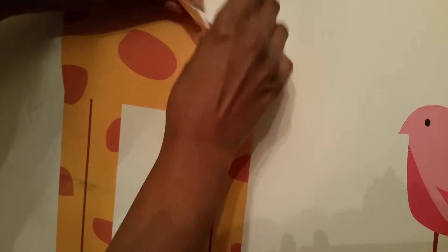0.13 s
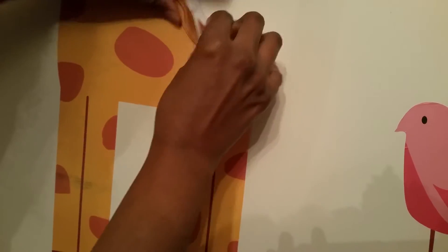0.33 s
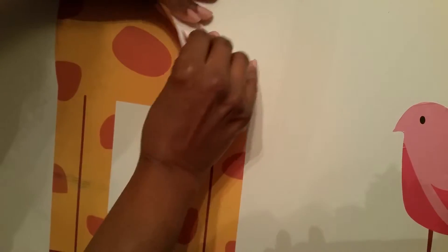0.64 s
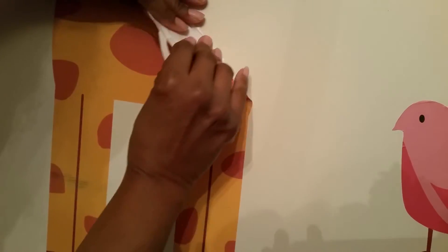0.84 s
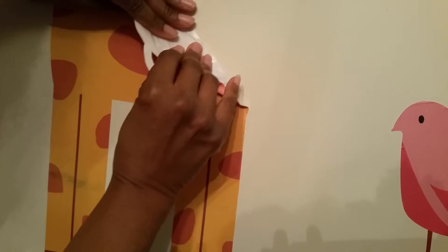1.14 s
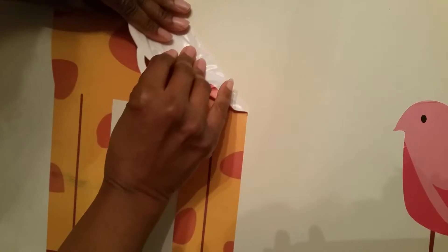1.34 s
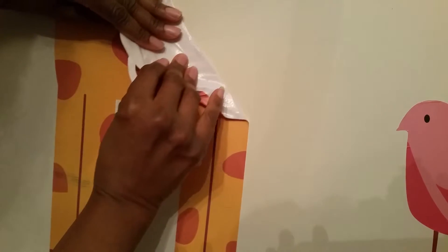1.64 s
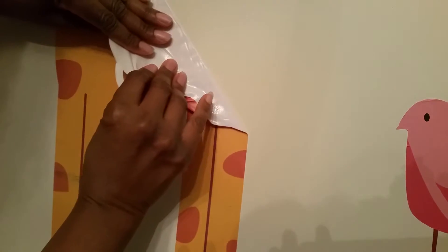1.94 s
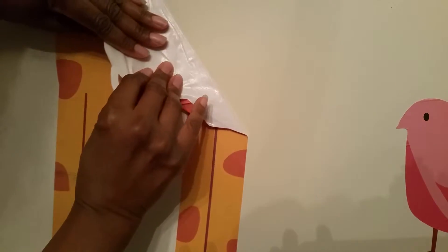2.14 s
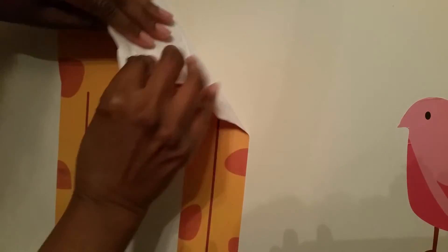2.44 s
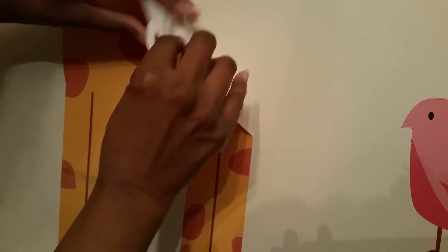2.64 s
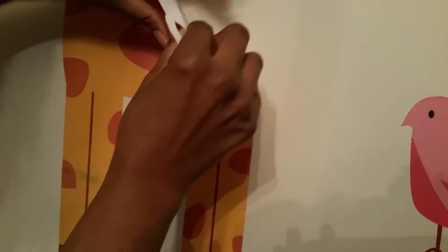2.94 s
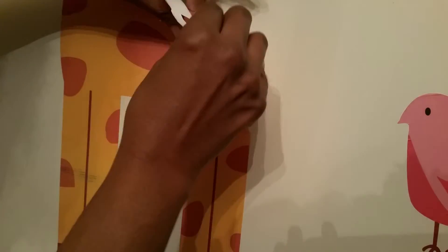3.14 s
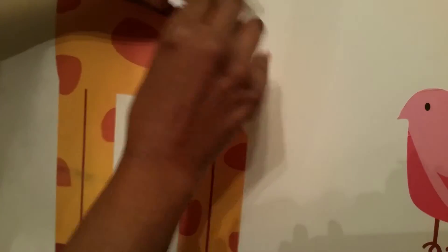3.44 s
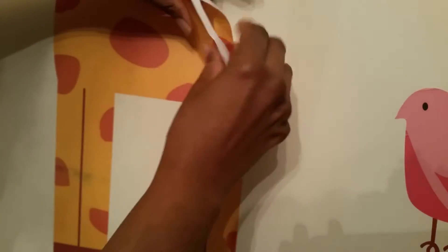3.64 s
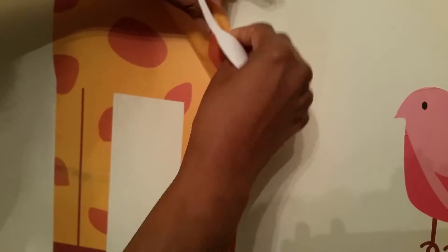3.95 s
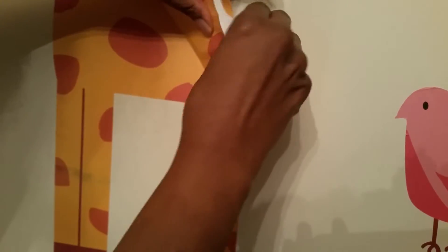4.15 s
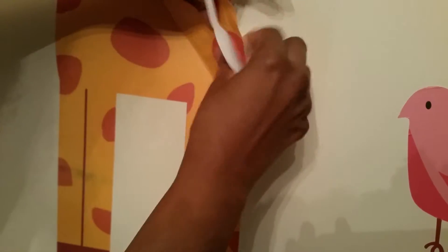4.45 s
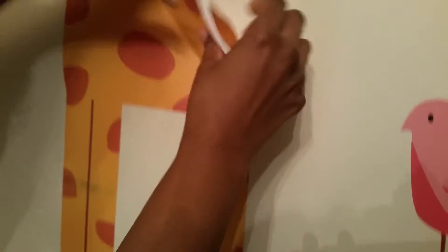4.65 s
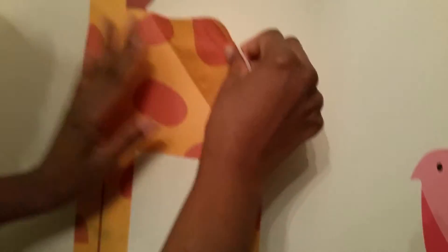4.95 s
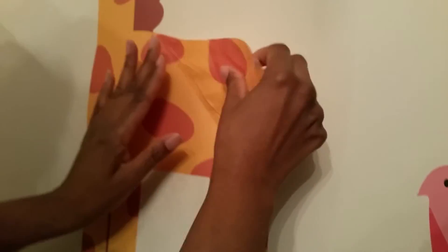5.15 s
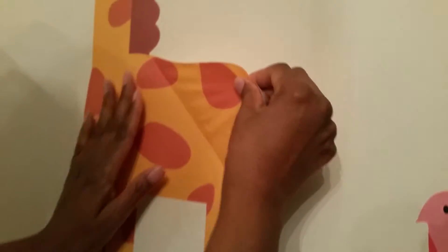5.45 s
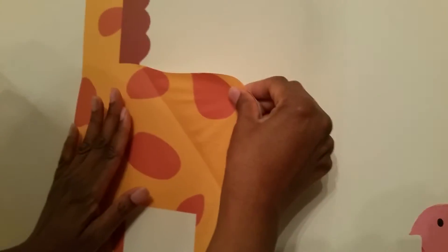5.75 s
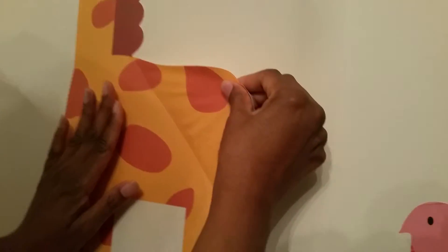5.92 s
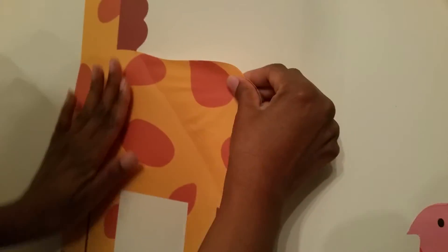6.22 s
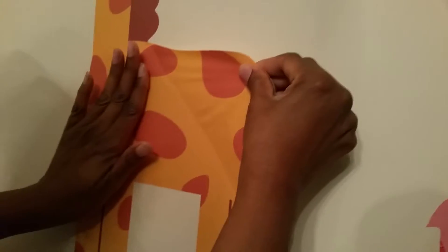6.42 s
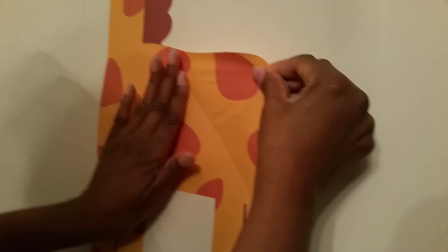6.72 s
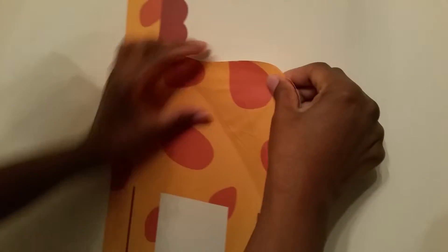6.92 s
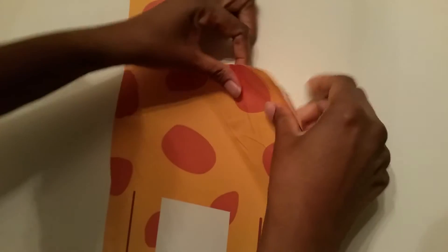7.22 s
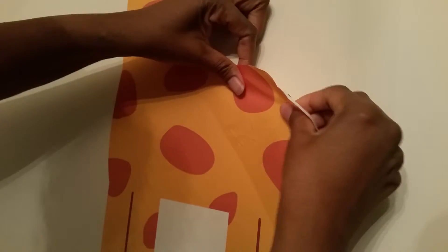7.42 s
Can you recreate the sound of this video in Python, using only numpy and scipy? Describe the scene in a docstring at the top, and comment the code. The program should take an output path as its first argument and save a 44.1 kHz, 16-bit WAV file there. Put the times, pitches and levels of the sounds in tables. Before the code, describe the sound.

Hands work an adhesive fabric sheet on an indoor wall. Quick rustles and small snaps open, then a faint lull leads to bright sharp cracks of glue. More uneven peeling follows, a loud double snap around four seconds, then quieter handling, soft palm swishes and final ticks. Close hand-held stereo microphone, small room with short reverberation, low rumble and faint hum, occasional dull bumps.

```python
"""Fabric rustles and glue snaps over a low drone and room rumble: hands peel a sticky sheet off a wall and smooth
it down again, close to a hand-held phone in a small room. Snaps and rustle are shaped noise bursts and clicks,
gliding palms are swelling hiss, ticks are short rings, and knocks on the phone are pushes sinking in pitch.
Sheet sounds stir the room and reach two unlike microphones; drone, hum and groan are wavering sines."""
import sys
import numpy as np
from scipy import signal
from scipy.io import wavfile
from scipy.ndimage import uniform_filter1d

SR = 44100
rng = np.random.default_rng(int(sys.argv[2]) if len(sys.argv) > 2 else 0)


def unload_audio(sound):
    """Save the sound as a 16-bit wav file, at the path given as the first command line argument."""
    columns = np.transpose(np.atleast_2d(sound))
    # keep every value between -1 and 1, then stretch to whole-number steps
    steps = np.round(np.clip(columns, -1, 1) * 32767)
    wavfile.write(sys.argv[1], SR, steps.astype(np.int16))


def field_ratio(decibels):
    """Amplitude ratio for a level in dB (20 dB per decade); scalars and array-likes work."""
    return 10 ** (np.asarray(decibels, dtype=float) / 20)


N = 334278  # length [samples]
HZ = np.fft.rfftfreq(1024, 1 / SR)  # frequency grid of the colouring filters


def evened(x):
    """Scales to rms 1."""
    return x / np.sqrt(np.mean(x ** 2) + 1e-20)


def read(points, hz):
    """Reads a spectrum table on a log frequency axis."""
    f, value = np.transpose(points)
    return np.interp(np.log(hz + 1), np.log(f + 1), value)


def add(mix, s, sound):
    """Mixes a sound in at time s, cutting it at the end of the mix."""
    part = mix[..., round(s * SR):][..., :sound.shape[-1]]
    part += sound[..., :part.shape[-1]]


def coloured(x, gain):
    """Causal minimum-phase filter with the gains given on the HZ grid."""
    log_gain = np.log(np.maximum(gain, 1e-5))
    circle = np.r_[log_gain, log_gain[-2:0:-1]]
    taps = np.fft.ifft(np.exp(np.conj(signal.hilbert(circle)))).real
    return signal.oaconvolve(x, taps[:len(gain)])[:len(x)]


def sounded(channels, shape):
    """Sends every channel through one spectrum table."""
    return np.array([coloured(c, field_ratio(read(shape, HZ))) for c in channels])


def wander(rate_hz):
    """Slow chance: random points of rms 1, rate_hz of them a second, joined by straight lines."""
    t = np.arange(N) / SR
    knots = rng.standard_normal(int(N / SR * rate_hz) + 3)
    return np.interp(t * rate_hz, np.arange(len(knots)), knots)


PATCH_DB = 2.5  # rms depth of the patches


def patchy(x):
    """Folds of the sheet colour it in random patches, some hundred Hz wide and a few tens of ms long."""
    z = signal.stft(x, nperseg=512)[2]
    patches = rng.standard_normal(z.shape[1:])
    patches = uniform_filter1d(patches, size=4, axis=0)
    patches = evened(uniform_filter1d(patches, size=8, axis=1))
    return signal.istft(z * field_ratio(PATCH_DB * patches), nperseg=512)[1][:, :N]


# Spectrum of the background, scaled as a whole afterwards: (frequency [Hz], relative density [dB per Hz])
FLOOR_SPECTRUM = [(12, -41), (20, -2), (43, -0.5), (117, 6), (289, -7.5), (361, -7), (560, -17),
                  (888, -18.5), (1430, -21.5), (1840, -25.5), (6000, -37.5), (7950, -38), (15200, -34),
                  (16500, -54)]
# Likeness of the two channels of the background: (frequency [Hz], correlation [0-1])
FLOOR_LIKENESS = [(60, 0.97), (240, 0.9), (950, 0.0143), (3770, 0.73), (15000, 0.092)]
FLOOR_DB = -55.5  # rms


def floor():
    """Room rumble, alike in both microphones, and their own hiss: noise built from random spectra."""
    frames, hz = N // 512 + 5, np.fft.rfftfreq(2048, 1 / SR)
    a, b, c, d = rng.standard_normal((frames, 1025, 4)).T
    same = np.clip(read(FLOOR_LIKENESS, hz), -1, 1)[:, None]
    left = a + 1j * b
    right = same * left + np.sqrt(1 - same ** 2) * (c + 1j * d)
    z = np.array([left, right]) * field_ratio(read(FLOOR_SPECTRUM, hz))[:, None]
    noise = signal.istft(z, nperseg=2048, noverlap=1536)[1][:, :N]
    return field_ratio(FLOOR_DB) * evened(noise)


# Course of the drone, silent after the last point: (time [s], frequency [Hz], rms level [dB])
DRONE_COURSE = [(0.0, 97.9, -50), (1.68, 102.5, -61.5), (2.061, 84.2, -56.5), (4.001, 87.14, -59.5)]
# One brief low tone: (start [s], end [s], frequency [Hz], rms level [dB])
GROAN_TONE = (4.52, 4.74, 362, -59)
HUM_HZ, HUM_DB = 119.1, -62  # level is rms
WAVER_DB, WAVER_PER_S = 3, 24  # scale and rate of the level's random wavering


def tones():
    """A drone that drifts in pitch, the mains hum and one brief groan: sines wavering in level and pitch."""
    t = np.arange(N) / SR
    s, hz, db = np.transpose(DRONE_COURSE)
    waver_db = [WAVER_DB * np.clip(wander(WAVER_PER_S), -2, 2) for _ in range(3)]
    drone_turns = np.cumsum(np.interp(t, s, hz) + 5.44 * wander(14)) / SR
    drone_level = field_ratio(np.interp(t, s, db, right=-99) + waver_db[0])
    drone = drone_level * np.sin(2 * np.pi * drone_turns)
    hum_turns = np.cumsum(HUM_HZ + 2.34 * wander(11)) / SR
    hum = field_ratio(HUM_DB + waver_db[1]) * np.sin(2 * np.pi * hum_turns)
    start, end, groan_hz, groan_db = GROAN_TONE
    gate = uniform_filter1d(1. * (t > start) * (t < end), 900)
    groan_turns = np.cumsum(groan_hz + 4.9 * wander(25)) / SR
    groan = gate * field_ratio(groan_db + 2 * waver_db[2]) * np.sin(2 * np.pi * groan_turns)
    return np.sqrt(2) * (drone + hum + groan)  # sqrt(2) makes the levels rms


# Decay of the room: (frequency [Hz], time to fall 60 dB [s])
ROOM_DECAY = [(250, 0.33), (1000, 0.32), (4000, 0.29), (12000, 0.19)]
ROOM_DB = -11  # level of the tails


def room(x):
    """Four sparse tails, fed in quick turns so that echoes stay smooth and unalike; each band dies at its own speed."""
    taps = np.zeros((4, 2, SR // 2))
    # one echo of random sign in every ten samples
    at = np.arange(120, SR // 2 - 20, 10) + rng.integers(0, 10, (4, 2, (SR // 2 - 131) // 10))
    np.put_along_axis(taps, at, rng.choice([-1., 1.], at.shape), 2)
    hz, t, z = signal.stft(taps, SR, nperseg=256)
    decay = field_ratio(-60 * t / read(ROOM_DECAY, hz)[:, None])
    tails = signal.istft(z * decay, SR, nperseg=256)[1]
    tails = tails / np.linalg.norm(tails[0, 0])
    turn = 2 * np.pi * np.arange(N) / SR * np.array([[83], [227]])  # Hz
    fed = x.mean(0) * np.r_[np.cos(turn), np.sin(turn)] / np.sqrt(2)
    return field_ratio(ROOM_DB) * signal.oaconvolve(fed[:, None], tails, axes=2).sum(0)[:, :N]


# Palms gliding flat over the fabric:
# (start [s], end [s], level [dB], brightness [dB per octave], share spent pressing in [0-1])
PALM_GLIDES = [(6.11, 6.299, -52, -0.5, 0.25), (6.271, 6.473, -66, 2, 0.36),
               (6.549, 6.878, -50.5, 0.6, 0.63)]
# Spectrum of skin on the weave, before brightness tilts it: (frequency [Hz], relative density [dB per Hz])
SKIN_SPECTRUM = [(500, -8), (1100, -6.5), (2400, -3.5), (4000, -2), (6200, -7.5), (8200, -14.5),
                 (11000, -20), (15500, -28)]
LIFT_SHARE = 0.28  # part of a glide spent lifting off


def glides():
    """Fine, even hiss of skin on the weave: dull while the palm presses in, brightest at full pressure."""
    out = np.zeros((2, N))
    for start, end, db, tilt_db, press_share in PALM_GLIDES:
        shape = [(hz, level + tilt_db * np.log2(hz / 3000)) for hz, level in SKIN_SPECTRUM]
        u = np.linspace(0, 1, round((end - start) * SR))
        ramps = np.minimum(u / press_share, (1 - u) / LIFT_SHARE)
        swell = np.sin(np.pi / 2 * np.clip(ramps, 0, 1))
        hiss = evened(sounded(rng.standard_normal((2, len(u))), shape))
        dull = uniform_filter1d(uniform_filter1d(hiss, size=9), size=9)
        add(out, start, field_ratio(db) * swell * (dull + swell ** 2 * (hiss - dull)))
    return out


SWELL_SHARE = 0.66  # part of a stroke spent swelling and fading


def stroke(start, end):
    """Power of a stroke: swells, holds, fades."""
    return signal.windows.tukey(round((end - start) * SR), SWELL_SHARE) ** 2


FLAP_PER_BRIGHT = 1.05  # dB that flap and wall lose for each dB of brightness
WEAVE_OVER_DB, WALL_OVER_DB = 1.5, 0.5  # how far weave and wall stand over the level


def layered(db, bright_db):
    """Power of weave, crackle, flap and wall: brightness lifts the crackle and lowers flap and wall."""
    loss_db = FLAP_PER_BRIGHT * bright_db
    over_db = np.array([[WEAVE_OVER_DB], [bright_db], [-loss_db], [WALL_OVER_DB - loss_db]])
    return field_ratio(db + over_db) ** 2


# Spectra of the sheet's weave, its crackle, its flapping and the wall behind it, shared with the snaps:
# each (frequency [Hz], relative density [dB per Hz])
WEAVE_SPECTRUM = [(700, -35), (1500, -0.5), (2500, 2), (3400, -0.5), (6000, -36)]
CRACKLE_SPECTRUM = [(2000, -49.5), (3300, 1), (4300, 2), (6000, -3.5), (7000, -3), (8200, -3),
                    (11000, -6.5), (15500, -21)]
FLAP_SPECTRUM = [(200, -28), (500, -3), (1000, 7.5), (1500, 4), (2500, -8.5), (5000, -79)]
WALL_SPECTRUM = [(60, -43.5), (150, 4.5), (300, -1), (450, -6), (900, -20), (2500, -100.5)]
# Rubbing gathers the crackle in a narrower band: (frequency [Hz], added gain [dB])
RUBBED_GAIN = [(4200, 2), (6000, 4), (8500, -3.5), (15000, 0)]
# Strokes of the hands over the sheet: (start [s], end [s], level [dB], brightness [dB])
HAND_STROKES = [(0, 0.075, -56, 1.5), (0.197, 0.302, -53, -5.5), (0.319, 0.394, -50.5, -4.5),
                (0.422, 0.63, -59.5, -1), (0.599, 0.69, -48.5, -1.5), (0.6, 1.14, -68.5, 5),
                (0.914, 1.695, -62, 1.5), (1.387, 2.028, -57, 2), (1.88, 2.41, -86, 19.5),
                (2.429, 2.463, -64, 7), (2.438, 2.657, -64.5, -2), (2.592, 2.913, -59.5, -0.5),
                (2.832, 2.871, -41.5, 4), (2.871, 2.964, -49, 2.5), (3.283, 3.47, -70.5, 5.5),
                (3.526, 3.63, -62.5, 1), (3.812, 4.04, -64, 0), (4.09, 4.25, -55.5, 2),
                (4.167, 4.323, -78, 18), (4.383, 4.468, -64.5, 1), (4.47, 4.797, -67, -1.5),
                (4.77, 4.96, -65.5, 2), (5.176, 5.303, -68, 1), (5.341, 5.392, -57, 0.5),
                (5.366, 5.678, -66.5, -2.5), (5.78, 6.04, -74, 6), (6.88, 6.975, -65, 0),
                (7.004, 7.235, -58.5, 1), (7.164, 7.186, -48.5, 0.5), (7.2, 7.395, -68, 2),
                (7.34, 7.47, -68.5, -3)]
# A hand leaning into the wall rumbles in it: (start [s], end [s], level [dB])
WALL_LEANS = [(0.128, 0.208, -46.5), (2.78, 2.85, -50), (3.562, 3.636, -45), (4.487, 4.762, -50.5),
              (5.177, 5.3, -62), (7.05, 7.26, -51.5)]
IDLE_DB, IDLE_BRIGHT_DB = -77.5, 2  # the held sheet is never quite still


def rustle():
    """Dense tiny clicks of uneven size, in clumps, spread over the sheet; the wall answers with an even rumble."""
    power = layered(IDLE_DB, IDLE_BRIGHT_DB) * np.ones(N)
    for start, end, db, bright_db in HAND_STROKES:
        add(power, start, layered(db, bright_db) * stroke(start, end))
    for start, end, db in WALL_LEANS:
        add(power[-1], start, field_ratio(db) ** 2 * stroke(start, end))
    clumps_db = 2.04 * wander(90) + 0.36 * wander(30)
    rubbed = [(hz, db + read(RUBBED_GAIN, hz)) for hz, db in CRACKLE_SPECTRUM]
    # spectrum, clicks a second, level of the channels' unlike part relative to their common part
    layers = ((WEAVE_SPECTRUM, 4000, .7), (rubbed, 7000, .7), (FLAP_SPECTRUM, 2000, .5))
    out = 0
    for level, (shape, per_s, spread) in zip(np.sqrt(power), layers):
        size = field_ratio(2.12 * np.minimum(rng.exponential(1, N), 5) + clumps_db)
        size = size * (rng.random(N) < per_s / SR)
        clicks = size * (rng.standard_normal(N) + spread * rng.standard_normal((2, N)))
        out = out + level * evened(sounded(clicks, shape))
    rumble = sounded(rng.standard_normal(N) + 0.2 * rng.standard_normal((2, N)), WALL_SPECTRUM)
    return patchy(out) + np.sqrt(power[-1]) * evened(rumble)


# Knocks on the phone, most near its right microphone:
# (time [s], peak of the push [dB], settled pitch [Hz], click over the push [dB], left over right [dB])
PHONE_BUMPS = [(0.153, -26.5, 180, -38, 2.5), (4.528, -33, 189, -35, 3), (5.198, -49, 207, -32, -32),
               (5.228, -42, 202, -20, 6), (5.469, -43, 167, -15.5, -22.5), (5.731, -37, 382, -10.5, -26.5),
               (6.105, -47.5, 312, -20, -21), (6.45, -67, 166, 7, -21), (6.9367, -41.5, 312, -8.5, -19),
               (6.957, -31, 161, -44, -27.5), (7.059, -40, 189, -28, 1), (7.134, -37.5, 210, -28, 0)]
# a knock starts this many times higher and sinks to its pitch; times in cycles of that pitch
START_TIMES, SINK_CYCLES, RISE_CYCLES, FADE_CYCLES = 4.6, 0.14, 0.13, 0.65
# the click also sweeps down through the phone's shell; level over the click's
ZING_HZ, ZING_SINK_MS, ZING_MS, ZING_DB = 5000, 0.784, 1, 2


def bumps():
    """A push of a cycle or two that sinks in pitch, with a click, carried through the phone's body with no room."""
    out, t = np.zeros((2, N)), np.arange(1800) / SR
    noises = rng.standard_normal((len(PHONE_BUMPS), 1800))
    for (s, db, hz, click_db, pan_db), noise in zip(PHONE_BUMPS, noises):
        u = t * hz
        turns = u + (START_TIMES - 1) * SINK_CYCLES * (1 - np.exp(-u / SINK_CYCLES))
        swell = (1 - np.exp(-(u / RISE_CYCLES) ** 2)) * np.exp(-u / FADE_CYCLES)
        push = -np.sin(2 * np.pi * turns) * swell
        click = 2.8 * field_ratio(click_db) * uniform_filter1d(noise, size=3) * np.exp(-t / 0.0006)
        sweep = ZING_HZ * ZING_SINK_MS / 1000 * (1 - np.exp(-t * 1000 / ZING_SINK_MS))
        life = t * 1000 / ZING_MS
        click += field_ratio(click_db + ZING_DB) * np.sin(2 * np.pi * sweep) * life * np.exp(1 - life ** 2)
        sides = field_ratio(db + np.array([[pan_db / 2], [-pan_db / 2]]))
        add(out, s, sides * (push / abs(push).max() + click))
    return out


# Short high rings: single threads parting, or the bright treble edge of a hard snap:
# (time [s], peak level [dB], pitch [Hz])
SHORT_RINGS = [(1.5875, -14.5, 4700), (1.6987, -11.5, 4570), (1.7947, -12, 6400), (1.8486, -18.5, 5000),
               (1.8683, -12, 4750), (2.8424, -25, 5800), (2.8557, -22, 6300), (2.901, -33, 6100),
               (2.942, -27, 5140), (4.167, -11.5, 10000), (4.1754, -15, 12500), (5.2435, -18.5, 2830),
               (5.3692, -32, 1460), (7.2355, -27, 2460)]
TICK_RISE_CYCLES, TICK_FADE_CYCLES = 1.5, 1.7


def ticks():
    """Each tick is a sine of a few cycles that swells and dies at once."""
    out, t = np.zeros((2, N)), np.arange(800) / SR
    for s, db, hz in SHORT_RINGS:
        u = t * hz
        swell = (1 - np.exp(-u / TICK_RISE_CYCLES)) * np.exp(-u / TICK_FADE_CYCLES)
        ring = np.sin(2 * np.pi * u) * swell
        add(out, s, field_ratio(db) * ring / abs(ring).max())
    return out


# a hard snap is over quickest, weaker ones tear longer: time to fall about 5 dB, and what each dB below hard adds
SHORTEST_MS, HARD_DB, MS_PER_DB = 3.3, -22.5, 0.11
CRACK_DB, FIRST_DB, FIRST_MS = 13, 5.5, 1.17  # the first thread cracks alone, then a brief flurry
RING_HZ, RING_WIDTH_HZ, RING_DB = 4700, 2060, 6  # resonance of the freed patch, before tautness shifts it
SCATTER = 1  # level of each thread's unlike part in the two microphones, relative to its common part


def snap(db, flap_db, crackle_db, semitones, chance):
    """One glue thread cracks and a quick run of others follows; those reach each microphone by other paths."""
    t = np.arange(len(chance)) / SR
    ms = SHORTEST_MS + MS_PER_DB * max(HARD_DB - db - max(crackle_db, flap_db, 0), 0)
    size = field_ratio(6.57 * abs(chance[:, 0]) - 8.0 - 4.97 * t / (ms / 1000))
    size *= field_ratio(FIRST_DB * np.exp(-t * 1000 / FIRST_MS))
    threads = size * (chance[:, 1] + SCATTER * chance[:, 2:].T)
    threads[:, 0] = field_ratio(CRACK_DB)
    alike = threads[[0, 0]]  # the wall sounds the same in both microphones
    taut_hz = HZ / 2 ** (semitones / 12)  # a taut sheet sounds higher
    ring = field_ratio(RING_DB / (1 + (2 * (taut_hz - RING_HZ) / RING_WIDTH_HZ) ** 2))
    # the crackle's own spectrum keeps its range
    layers = ((WEAVE_SPECTRUM, 0, taut_hz, threads), (CRACKLE_SPECTRUM, crackle_db, HZ, threads),
              (FLAP_SPECTRUM, flap_db, taut_hz, threads), (WALL_SPECTRUM, flap_db - 9.5, taut_hz, alike))
    out = 0
    for shape, over_db, seen_hz, source in layers:
        gain = ring * field_ratio(read(shape, seen_hz))
        part = np.array([coloured(c, gain) for c in source])
        out = out + field_ratio(db + over_db) * part / abs(part.mean(0)).max()
    return out


# Glue letting go: (time [s], peak of the weave [dB], flap of the sheet over it [dB], crackle over it [dB],
# shift with the sheet's tautness [semitones])
GLUE_SNAPS = [(0.0412, -31, 0.5, 9.5, -2.2), (0.063, -34.5, 8, 7, -2), (0.142, -28.5, -37, -4.5, 1.5),
              (0.288, -44.5, -4, 6, 1.5), (0.334, -31.5, 4.5, -6, 1.5), (0.4736, -50.5, 3, 13.5, -4),
              (0.4883, -57, -5, 18.5, -1), (0.523, -47.5, 6.5, -22, 1.5), (0.578, -31, -12, -21, 0.5),
              (1.5684, -24.5, -11.5, 6.5, 5), (1.5867, -25.5, -3, 8, -2.5), (1.6988, -27, -17, -0.5, 1),
              (1.7942, -24.5, -13, 10, 4.5), (1.8018, -45, -13, 18, 2), (1.867, -32, -8.5, 20, 0),
              (2.261, -51.5, -4, 5, 6), (2.4897, -31.5, 0.5, -0.5, -1), (2.517, -29.5, 2.5, -1, 6.5),
              (2.5327, -20.5, -3.5, 0.5, 4.5), (2.6805, -55, 13, -20, 3), (2.7634, -49.5, 12, 16.5, 4.5),
              (2.796, -37.5, 3.5, 10.5, 0), (2.837, -30, -7, -3, 5.5), (2.8895, -36, 1.5, 8, 6.5),
              (2.9258, -36.5, 1.5, 7.5, -2.3), (3.121, -51, -16, -0.5, -3), (3.207, -61, 14.5, -14.5, 0),
              (3.2878, -43, 4.5, -14, -2), (3.419, -32.5, -3, -12.5, 0.5), (3.5848, -39, 7.5, 7, -1.5),
              (3.6136, -38, -12, -2, 3), (3.863, -27.5, -5.5, -1, 3), (3.925, -33, -24, 1, 8.5),
              (4.1292, -26.5, -8.5, -4, -5.5), (4.147, -29, 7, -10.5, -1), (4.1665, -18.5, -8.5, 5, 5.5),
              (4.174, -21.5, 0, 9, 1), (4.4041, -45.5, -1, -2, 0), (4.4223, -42.5, 0.5, 2, 0),
              (4.4857, -33.5, -4.5, -10.5, 5), (4.582, -37, -2.5, -5, 0), (4.6226, -34, -2, 3.5, -2),
              (4.8, -51, -13, 3.5, -1.5), (4.8766, -50, 8.5, 2, 7), (5.1679, -35.5, 0, 3, 4),
              (5.2434, -24, -8, -5.5, 3), (5.341, -52, -3, 4, 7), (6.9967, -42.5, -13, -4, 2.5),
              (7.1777, -24.5, -16, -5, -0.2), (7.2352, -23.5, -15.5, -10.5, 3), (7.2992, -52, -14, 2, 1),
              (7.4175, -38.5, -18, -7, -1), (7.4233, -37.5, -12, -7, -2)]


def snaps():
    """Lays out every snap, each with its own random run of threads."""
    out, chance = np.zeros((2, N)), rng.standard_normal((len(GLUE_SNAPS), 2600, 4))
    for (s, *row), draw in zip(GLUE_SNAPS, chance):
        add(out, s, snap(*row, draw))
    return out


# Colour of the phone's shell on all sheet sounds: (frequency [Hz], gain [dB])
SHELL_COLOUR = [(2100, -0.5), (2750, 2.5), (3200, -3.5), (4100, -0.5)]
# The two microphone ports hear unlike: (frequency [Hz], left over right [dB])
PORT_BALANCE = [(60, -1), (330, 0), (500, -4.5), (1790, -0.5), (2740, -2), (4190, -10), (6410, -16),
                (9810, 8.5), (15000, -0.5)]
LEAD_MS = .14  # sound reaches the left microphone first
TICK_ROOM_DB = -6.5  # ticks point at the phone and stir the room less


def scene():
    """Sheet sounds pass the room and the unlike microphone ports; the rest is added at the phone."""
    sheet = snaps() + rustle() + patchy(glides())
    single = ticks()
    echoes = room(sheet + field_ratio(TICK_ROOM_DB) * single)
    left, right = sounded(sheet + single + echoes, SHELL_COLOUR)
    half_db = read(PORT_BALANCE, HZ) / 2
    early = coloured(left, field_ratio(half_db))
    late = np.roll(coloured(right, field_ratio(-half_db)), round(LEAD_MS * SR / 1000))
    return np.array([early, late]) + bumps() + tones() + floor()


def low_pass(x):
    """Removes everything above the highest recorded frequency."""
    return signal.sosfilt(signal.butter(12, 16680, fs=SR, output="sos"), x)


def record(dry):
    """The phone's band limit: a steep low-pass takes away the top treble."""
    edge = signal.firwin(255, 15900, window=("kaiser", 8), fs=SR)  # Hz
    mix = signal.oaconvolve(dry, edge[None], "same")
    return low_pass(mix)


dry = scene()
out = record(dry)
unload_audio(out)
```